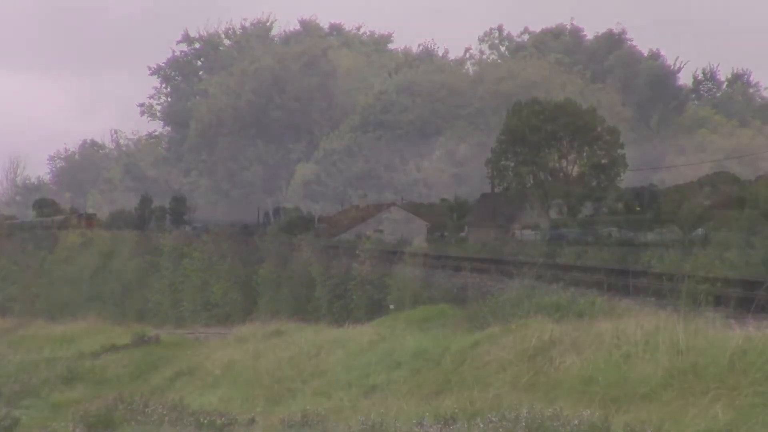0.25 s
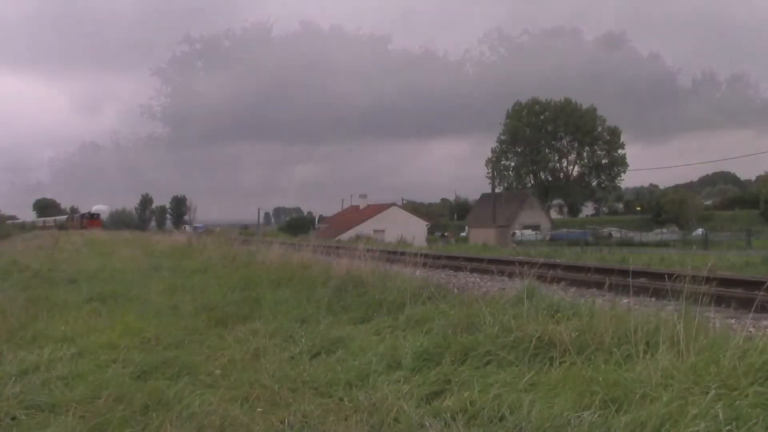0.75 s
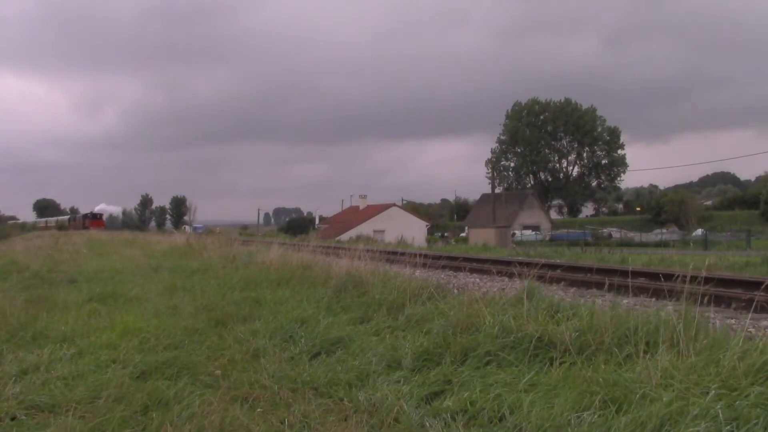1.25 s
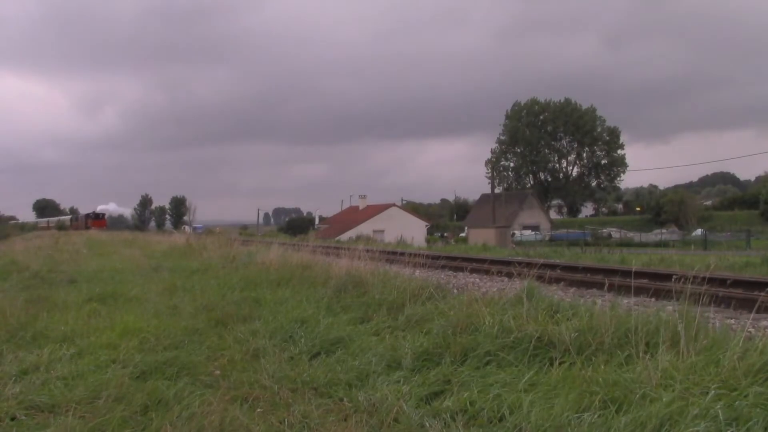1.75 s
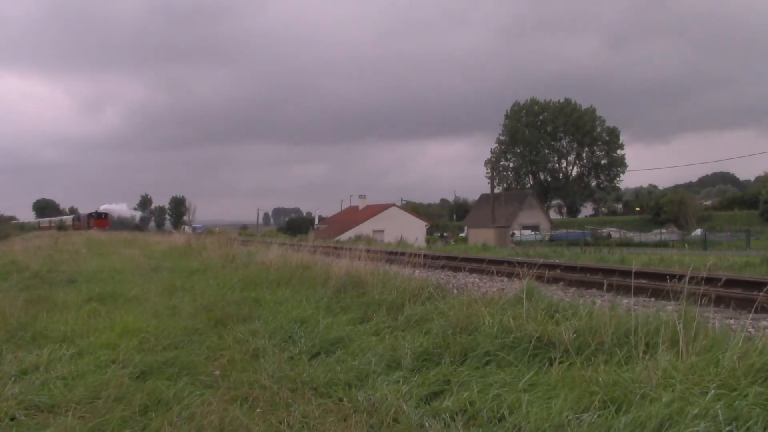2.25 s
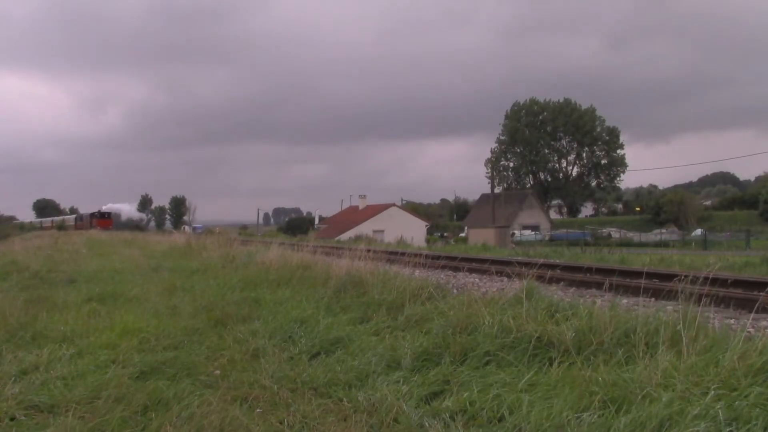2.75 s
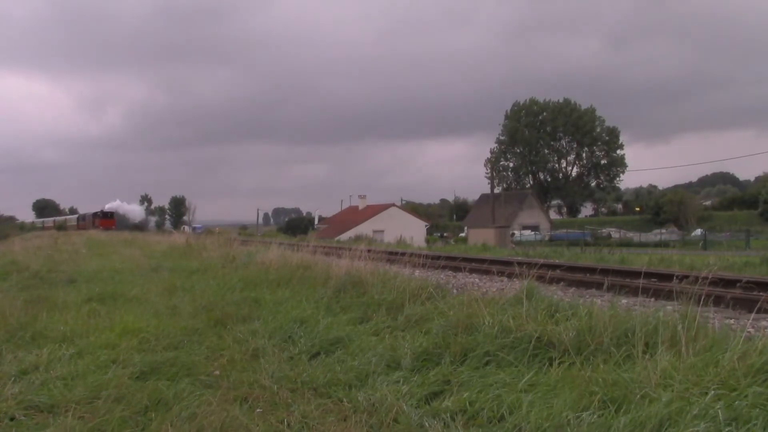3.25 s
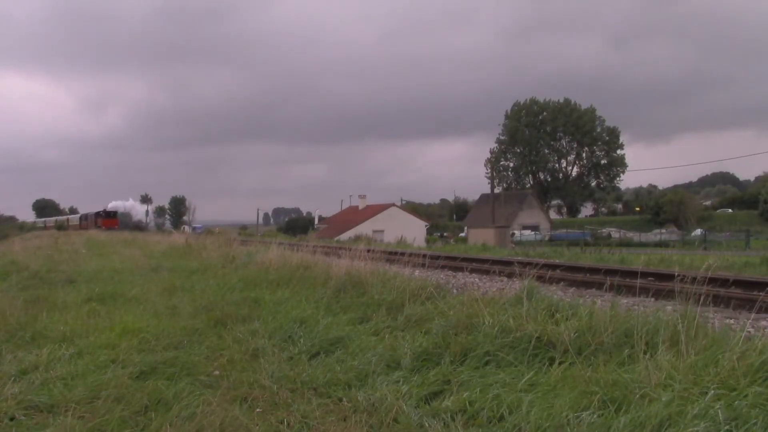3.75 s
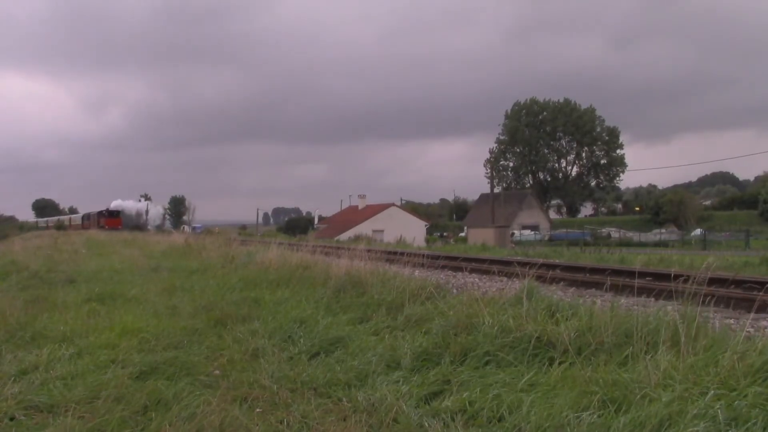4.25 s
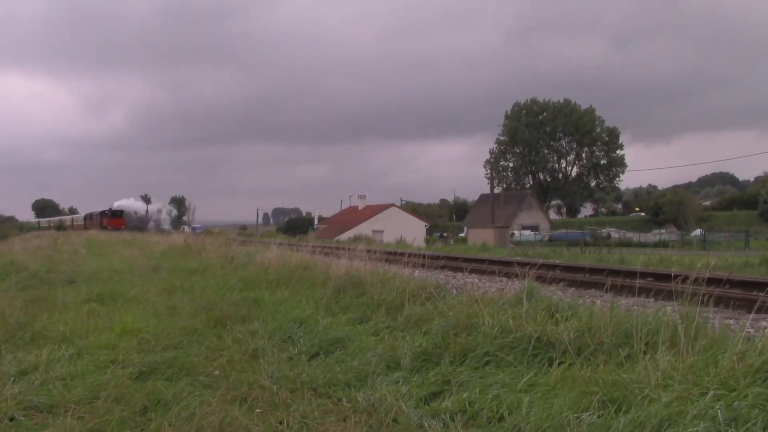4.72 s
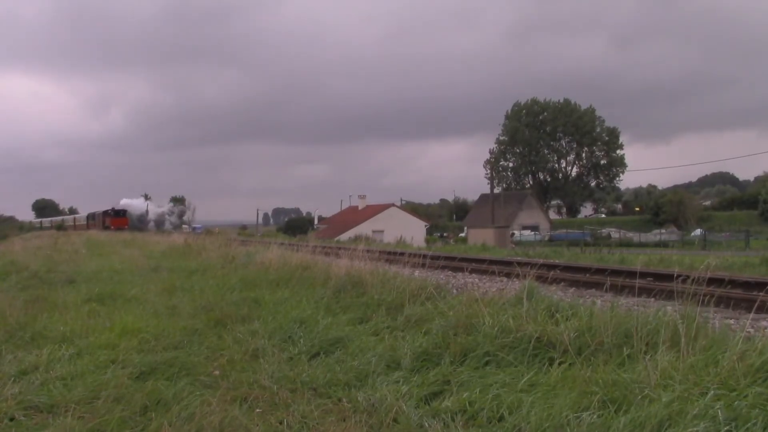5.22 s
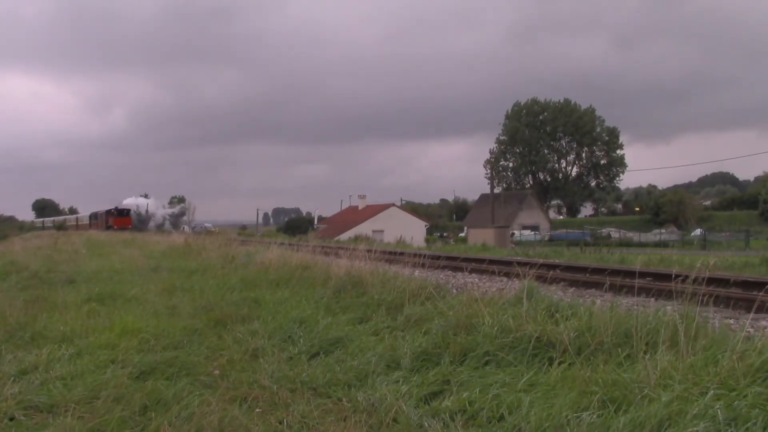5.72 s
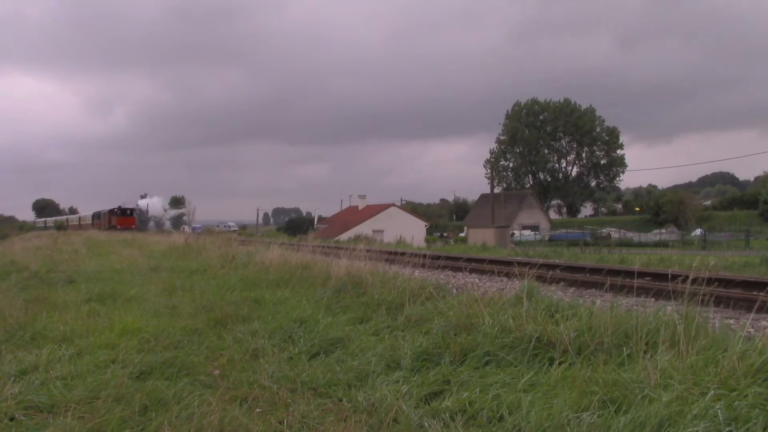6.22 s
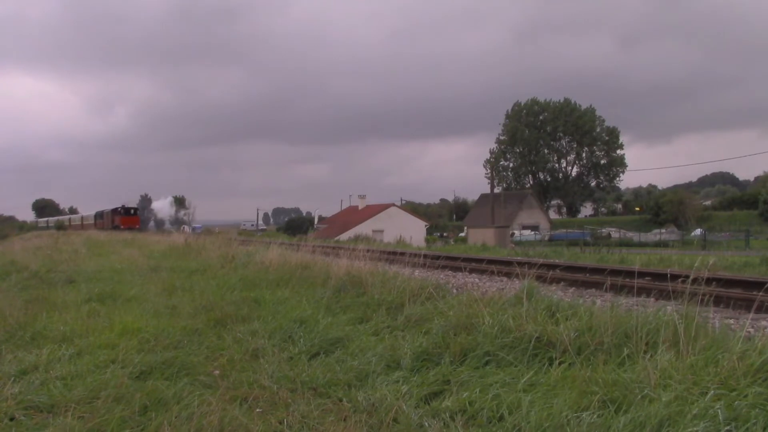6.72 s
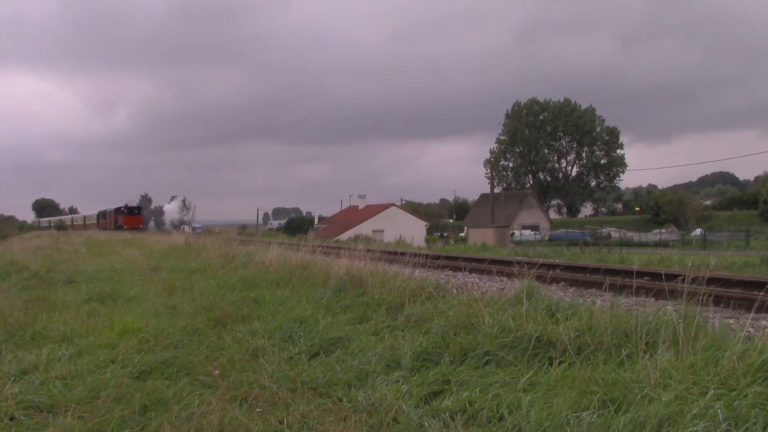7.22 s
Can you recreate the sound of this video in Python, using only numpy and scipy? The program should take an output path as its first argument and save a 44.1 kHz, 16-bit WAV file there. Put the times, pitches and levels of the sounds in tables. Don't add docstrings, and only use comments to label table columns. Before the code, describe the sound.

Strong gusts thump and crackle on a small outdoor microphone. A distant steam whistle spits hiss, wavers into a single high note, then gives a short blast, a long held one and a final short one. Trees and houses return blurred echoes. Afterwards only soft field rustle, faint wind and one tiny dry tick remain.

```python
import sys
import numpy as np
from scipy import signal
from scipy.fft import rfft, irfft, next_fast_len
from scipy.io import wavfile
from scipy.ndimage import uniform_filter1d, map_coordinates

SR = 44100
rng = np.random.default_rng(int(sys.argv[2]) if len(sys.argv) > 2 else 0)


def gain_from_db(level_db):
    decades = np.asarray(level_db, float) / 20
    return 10 ** decades


def waveform_to_disk(signal):
    frames = np.transpose(np.atleast_2d(signal))
    scaled = np.clip(frames, -1, 1) * 32767
    samples = np.round(scaled).astype(np.int16)
    wavfile.write(sys.argv[1], SR, samples)


N = 329868
TIME_S = np.arange(N) / SR


def unit(x):
    return x / np.sqrt(np.mean(x ** 2) + 1e-20)


def along(points, hz):
    point_hz, value = np.transpose(points)
    return np.interp(np.log(hz + 1), np.log(point_hz + 1), value, left=-120, right=-120)


def curves(rows, **ends):
    s, *columns = np.transpose(rows)
    return [np.interp(TIME_S, s, column, **ends) for column in columns]


def wobble(rate):
    knots = rng.standard_normal(int(N * rate / SR) + 4)
    return map_coordinates(knots, [np.arange(N) * rate / SR])


def coloured(x, spectrum):
    size = next_fast_len(len(x) + 8192)
    gain = gain_from_db(along(spectrum, np.fft.rfftfreq(size, 1 / SR)))
    return irfft(rfft(x, size) * gain, size)[:len(x)]


def rush(spectrum, patchy_db):
    z = signal.stft(rng.standard_normal(N), nperseg=512)[2]
    patches = uniform_filter1d(rng.standard_normal(z.shape), size=8, axis=0)
    patches = unit(uniform_filter1d(patches, size=12, axis=1))
    noise = signal.istft(z * gain_from_db(patchy_db * patches), nperseg=512)[1][:N]
    return unit(coloured(noise, spectrum))


# open_s, rise_time_s, shut_s, closing_time_s
PULLS = [
    (1.15, 0.14, 2.831, 0.067),
    (2.93, 0.023, 3.229, 0.031),
    (3.368, .02, 5.309, 0.0221),
    (5.465, 0.021, 5.792, .035),
]
CRACKED_S, CRACKED_SHARE, CATCH_S = 0.489, 0.68, 0.83


def pressure_rise(start_s, rise_s):
    return 1 - np.exp(-np.clip(TIME_S - start_s, 0, None) / rise_s)


def valve(linger_s=0):
    pressure = np.zeros(N)
    for k, (opens, rise_s, shut, closing_s) in enumerate(PULLS):
        if linger_s and k:
            up = pressure_rise(opens - 0.012, 0.044)
        elif linger_s:
            up = 0.53 * pressure_rise(CRACKED_S, 0.037) + 0.26 * pressure_rise(opens, 0.3)
        elif k:
            up = pressure_rise(opens, rise_s)
        else:
            up = CRACKED_SHARE * pressure_rise(CATCH_S, 0.025)
            up += (1 - CRACKED_SHARE) * pressure_rise(opens, rise_s)
        closed = np.clip(1 + (TIME_S - shut - linger_s) / (closing_s + linger_s), 0, 1)
        pressure += up * (1 - closed ** 1.5)
    return pressure


def held_s():
    pulls = np.array([0, CRACKED_S] + [row[0] for row in PULLS[1:]])
    return TIME_S - pulls[np.searchsorted(pulls, TIME_S, side="right") - 1]


def fog_db():
    return -6 * (1 - np.exp(-held_s() / 0.97))


# time_s, tone_db, octave_db, steam_db
HELD_LEVELS = [
    [(1.42, -18, -30, -48), (1.692, -20.5, -27.5, -45), (1.804, -17.5, -30, -43),
     (2.008, -16.5, -25, -38.5), (2.136, -24.5, -28, -37), (2.352, -14.5, -29.5, -42.5),
     (2.598, -19, -21, -38.5), (2.736, -15, -23, -39.5), (2.76, -19, -25, -40)],
    [(2.97, -16, -30, -44), (3.106, -13, -28.5, -48.5), (3.178, -15, -25, -49), (3.2, -17, -28, -49.5)],
    [(3.4, -15, -35.5, -47), (3.45, -14, -30, -48), (3.512, -12.5, -26.5, -44), (3.662, -12.5, -24.5, -47),
     (4.038, -13, -20.5, -38), (4.218, -13.5, -20.5, -40), (4.336, -15, -27, -42.5),
     (4.992, -18.5, -23.5, -46.5), (5.25, -16, -29, -50.5)],
    [(5.49, -21, -36, -46), (5.58, -20, -27, -45), (5.648, -15, -32, -46), (5.674, -18.5, -35, -44.5),
     (5.718, -18.5, -24, -48.5), (5.76, -19.5, -26.5, -45)],
]
USUAL_DB = -43.5
# multiple, level_db against the fourth partial
HIGH_PARTIALS = [
    (5, -5),
    (6, -16),
    (7, -14),
]


def whistle_pitch(pressure, dry_s):
    cold_hz = 16 * np.exp(-np.clip(TIME_S - dry_s, 0, None) / 1.1)
    hz = 1127 - cold_hz - 2.1 * held_s() + 1.284 * wobble(5)
    hz = hz - 114.8 * (1 - pressure) + 1.48 * wobble(60)
    return 2 * np.pi * np.cumsum(hz) / SR + 0.029 * wobble(400)


def whistle():
    tone_db, octave_db, steam_db = curves(np.vstack(HELD_LEVELS))
    pressure = valve()
    dry_s, top_dry_s = 1.367, 1.78
    wet_db = -50 * np.clip(dry_s - TIME_S, 0, None)
    top_wet_db = -23 * np.clip(top_dry_s - TIME_S, 0, None)
    choke_db = -7.5 * np.exp(-((TIME_S - 1.1) / 0.025) ** 2)
    drive = (1 - (1 - pressure) ** 2) * gain_from_db(wet_db + choke_db + 0.08 * wet_db * wobble(25))
    rich = pressure * gain_from_db(wet_db)
    chiff_db = 0
    for opens, *_ in PULLS[1:]:
        chiff_db = chiff_db + 11.5 * (TIME_S > opens) * np.exp(-np.abs(TIME_S - opens) / 0.072)
    twelfth_db = steam_db + 1.5 + chiff_db
    fourth_db = steam_db - 1.5 + fog_db() + top_wet_db

    phase = whistle_pitch(pressure, dry_s)
    tone = drive * gain_from_db(tone_db + 0.35 * wobble(9) + 0.4 * wobble(45)) * np.sin(phase)
    octave = gain_from_db(octave_db + 1.6 * wobble(9) + 0.91 * wobble(45)) * np.sin(2 * phase + 0.89)
    upper = gain_from_db(twelfth_db + 1.1 * wobble(5.5) + 2.18 * wobble(60)) * np.sin(3 * phase + 0.51 * wobble(90))
    upper += gain_from_db(fourth_db + 2.0 * wobble(6.4) + 2.77 * wobble(50)) * np.sin(4 * phase + 0.39 * wobble(90))
    for multiple, db in HIGH_PARTIALS:
        twinkle_db = 4.4 * wobble(7) + 3.0 * wobble(50)
        partial = np.sin(multiple * phase + 0.49 * wobble(90))
        upper += gain_from_db(fourth_db - 2.5 + db + twinkle_db) * partial
    return np.sqrt(2) * (tone + rich ** 1.7 * octave + rich ** 1.6 * upper)


# pitch_hz, level_db per Hz
ROAR_COLOUR = [(600, -42.5), (950, -9), (1500, -6.5), (2400, -5.5), (2950, 1), (3600, -4.5), (5500, -12.5),
               (9000, -40.5)]
# pitch_hz, level_db per Hz
FIZZ_COLOUR = [(2500, -33), (4500, -1.5), (7800, 0.5), (10200, -2.5), (12000, -15.5), (14000, -25.5),
               (15700, -30)]


def steam():
    flow_db = curves(np.vstack(HELD_LEVELS))[2] - USUAL_DB
    spurt_db = 7.5 * np.exp(-np.abs(TIME_S - CRACKED_S - 0.07) / 0.089)
    gust = wobble(14)
    roar_db = 5.5 + flow_db + spurt_db + 0.27 * gust
    roar = valve(linger_s=0.018) * gain_from_db(roar_db) * rush(ROAR_COLOUR, patchy_db=2.0)
    fizz_db = 2 + 0.85 * flow_db + fog_db() + 0.44 * wobble(6.5) + 1.5 * gust + 0.6 * wobble(40)
    fizz = valve(linger_s=0.062) * gain_from_db(fizz_db) * rush(FIZZ_COLOUR, patchy_db=1.7)
    return gain_from_db(USUAL_DB) * (roar + fizz)


# delay_s at the last blast, lag_m_per_s (engine nears it slower than the listener), level_db
WALLS_AND_TREES = [(0.17, 0.154, -11), (.16, 7.5, -17), (0.54, 8.6, -20), (0.57, 10.5, -26.5),
                   (.38, 6, -25.5), (.95, 6.5, -34), (0.94, 3, -34.5)]
# delay_s, level_db
SCATTER_TAIL = [(.02, -16), (.06, -11), (.3, -3.5), (.5, -7.5), (.75, -15.5), (1.1, -19.5), (1.7, -22)]
# pitch_hz, level_db
ECHO_COLOUR = [(500, -1.5), (1100, -3), (2200, -5.5), (4500, -2), (9000, -5.5), (15000, -20)]


def landscape(x):
    n, out = np.arange(N), np.zeros(N)
    since_last = n - PULLS[-1][0] * SR
    approach_db = 3.5 * np.minimum(since_last / SR, 0)
    for delay, lag, db in WALLS_AND_TREES:
        heard = n - delay * SR - lag / 343 * since_last + 4 * delay * wobble(12)
        twinkle_db = 3 * wobble(18) * min(delay / 0.6, 1) ** 2
        out += gain_from_db(db + twinkle_db + approach_db) * map_coordinates(x, [heard])
    delay, db = np.transpose(SCATTER_TAIL)
    t = np.arange(round(delay[-1] * SR)) / SR
    tail = gain_from_db(np.interp(t, delay, db, left=-120)) * rng.standard_normal(len(t))
    stirred = map_coordinates(x, [n - 4 / 343 * since_last + 5.9 * wobble(15)])
    out += gain_from_db(-17) * signal.fftconvolve(stirred, tail / np.linalg.norm(tail))[:N]
    return coloured(out, ECHO_COLOUR)


# centre_s, half_length_s, strength_db, sharpness_db
GUST_SWELLS = [(.11, 0.051, -29.5, -13), (0.188, 0.047, -29, -10), (0.307, 0.047, -33, -5),
               (0.407, 0.062, -34.5, -2), (0.634, 0.09, -31.5, -2.5), (.78, 0.068, -40, 1),
               (0.97, 0.13, -33.5, -3), (1.214, 0.057, -45, -9), (1.42, 0.065, -50.5, -9),
               (1.744, 0.13, -45, -9.5), (2.08, 0.12, -44, -10.5), (2.33, 0.053, -44.5, -8),
               (2.56, .14, -44, -9), (2.885, 0.093, -46, -9), (3.053, .1, -48.5, -10),
               (3.329, 0.084, -48.5, -9), (3.57, .07, -48, -9), (3.803, 0.067, -43.5, -9.5),
               (3.979, 0.07, -43, -7.5), (4.474, 0.028, -53, -7), (4.854, 0.12, -63, -9),
               (5.03, .04, -66, -16.5), (5.277, 0.079, -50.5, -10.5), (5.658, .03, -67, -8),
               (5.976, 0.024, -71, -11), (6.36, .08, -61.5, -10.5), (6.52, 0.07, -49.5, -12.5),
               (6.95, .08, -52, -12.5), (7.2, 0.12, -52, -11.5), (7.463, 0.036, -68, -14)]


def gusts():
    power = np.full((3, N), gain_from_db(2 * -77.5))
    for s, half_s, db, sharp_db in GUST_SWELLS:
        shares = gain_from_db([2 * (-22 - 1.53 * sharp_db), 0, 2 * sharp_db])
        swell = gain_from_db(2 * db) * np.exp(-np.abs((TIME_S - s) / half_s) ** 2.44)
        power += shares[:, None] * swell
    return 10 * np.log10(power)


# start_s, peak_db, pitch_hz
EDDY_BLOWS = [(.102, -16, 328), (.108, -12, 340), (.288, -16, 340), (.297, -18, 280), (.342, -21.5, 517),
              (0.891, -20, 340), (4.451, -46, 260.7), (4.483, -32.5, 521), (5.324, -32.5, 328.3),
              (6.506, -31, 254.4)]


def thumps():
    out, t = np.zeros(N + SR), np.arange(SR // 20) / SR
    for s, db, hz in EDDY_BLOWS:
        u = t * hz / 0.34
        punch = u * np.exp(-u) * np.sin(2 * np.pi * hz * t)
        out[round(s * SR):][:len(t)] += gain_from_db(db + 11) * punch
    return out[:N]


# start_s, peak_db
GRILLE_PUFFS = [(0.1211, -44), (0.1675, -36.5), (0.2057, -33), (0.2608, -42), (0.2917, -48), (0.3227, -40),
                (0.359, -32), (0.4155, -41), (0.4464, -35), (0.5013, -54), (0.6365, -37), (0.8794, -42)]
# pitch_hz, level_db per Hz
GRILLE_COLOUR = [(500, -20), (900, 0.5), (1600, -7), (2500, -18), (3500, -33)]


def crackles():
    puffs = np.zeros(N)
    for s, db in GRILLE_PUFFS:
        puffs += gain_from_db(db - 4) * np.exp(-np.abs(TIME_S - s - 0.004) / 0.006)
    return puffs * gain_from_db(1.4 * wobble(147.3)) * rush(GRILLE_COLOUR, patchy_db=3.0)


# pitch_hz, level_db per Hz
THUD_COLOUR = [(25, -33), (60, -21.5), (110, -7.5), (160, 1), (200, -2), (260, -16.5)]
BUFFET_COLOUR = [(140, -25), (210, 0), (330, 0), (430, -4.5), (560, -29)]
FLUTTER_COLOUR = [(340, -15), (470, 4.5), (700, -2.5), (1200, -17), (2500, -44), (5000, -61)]
# time_s, level_db against the buffet
PORT_DIFFERENCE = [(0, -13), (.1, -4), (.24, -11), (.26, -22), (.29, 3), (.31, -23), (.54, -25), (.57, -60)]


def wind():
    thud_db, buffet_db, flutter_db = gusts()
    lumps = 0.3 * wobble(25) + 1.7 * wobble(70)

    def eddies(colour):
        return unit(gain_from_db(lumps + 1.9 * wobble(60)) * rush(colour, patchy_db=1.35))

    blows = thumps()
    both = gain_from_db(thud_db + 2.8) * eddies(THUD_COLOUR)
    both += gain_from_db(buffet_db - 0.43) * eddies(BUFFET_COLOUR)
    both += gain_from_db(flutter_db + 1.2) * eddies(FLUTTER_COLOUR)
    both += blows + crackles()
    other = gain_from_db(buffet_db) * eddies(BUFFET_COLOUR) + gain_from_db(flutter_db - 3) * eddies(FLUTTER_COLOUR)
    side = 0.092 * both + 1.66 * other + 0.26 * blows
    side *= gain_from_db(curves(PORT_DIFFERENCE, right=-120)[0])
    return np.array([both + side, both - side])


# start_s, peak_db
STEM_SNAP = [
    (6.8316, -40),
]
# pitch_hz, level_db, t60_s
STEM_MODES = [
    (5100, 6, .012),
    (7704, 3, 0.011),
]


def stem():
    out, t = np.zeros(N), np.arange(SR // 50) / SR
    for s, db in STEM_SNAP:
        for hz, mode_db, t60 in STEM_MODES:
            ring = gain_from_db(db - 9.5 + mode_db - 60 * t / t60) * np.sin(2 * np.pi * hz * t)
            out[round(s * SR):][:len(t)] += ring
    return out


# pitch_hz, level_db per Hz
AIR_COLOUR = [(350, -50.5), (600, -11.5), (953, -6.5), (1030, -1), (1120, -2.5), (1810, -11), (3160, -12),
              (4320, -19.5), (6780, -21), (15600, -44)]
# pitch_hz, level_db per Hz
GROUND_COLOUR = [(25, -20.5), (43, -12), (113, -1), (260, -5), (700, -10), (910, -33.5)]
# time_s, level_db
FIELD_FADE = [(0, -3.5), (.4, -7.5), (.6, 1.5)]


def fields():
    air = gain_from_db(-54.5 + 2.1 * wobble(2.826)) * rush(AIR_COLOUR, patchy_db=1.0)
    air += gain_from_db(-66.5) * rush(GROUND_COLOUR, patchy_db=3.0)
    wide = gain_from_db(-78) * rush([(4000, -20), (6000, 5), (12500, 9), (14500, -10.5)], patchy_db=5.0)
    return gain_from_db(curves(FIELD_FADE)[0]) * np.array([air + wide, air - wide])


def scene():
    jet = steam()
    engine = whistle() + jet
    wide_colour = [(3500, -25.5), (5500, -5.5), (9000, -18.5), (12000, 3.5), (15000, -1.5)]
    width = gain_from_db(-14.0) * coloured(np.roll(jet, SR // 7), wide_colour)
    return engine + landscape(engine) + width * [[1], [-1]] + wind() + stem() + fields()


def roll_off(x):
    return signal.sosfilt(signal.butter(12, 15700, fs=SR, output="sos"), x)


def record(dry):
    cut = signal.butter(2, 75, "highpass", fs=SR, output="sos")
    return roll_off(signal.sosfilt(cut, dry))


dry = scene()
out = record(dry)
waveform_to_disk(out)
```